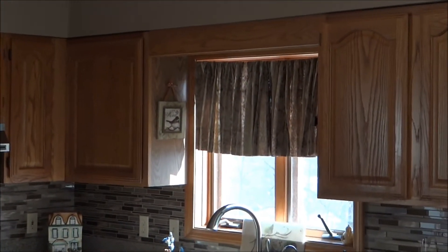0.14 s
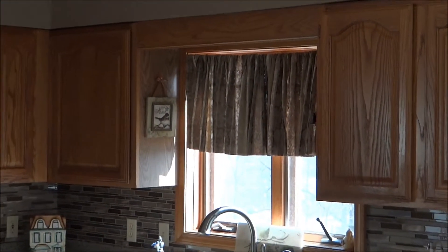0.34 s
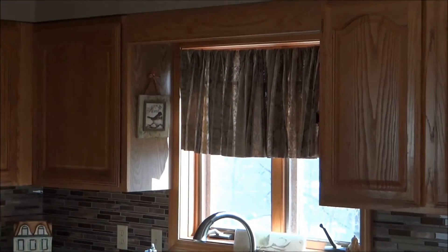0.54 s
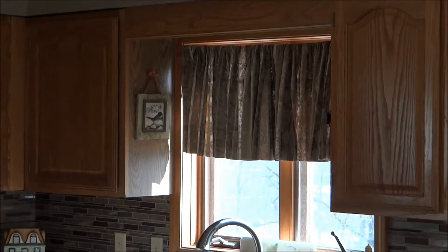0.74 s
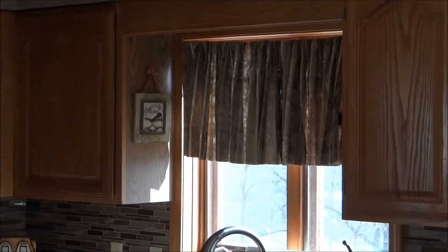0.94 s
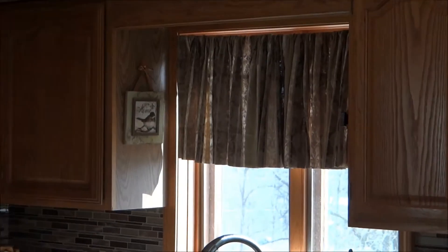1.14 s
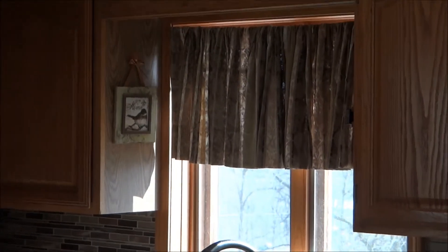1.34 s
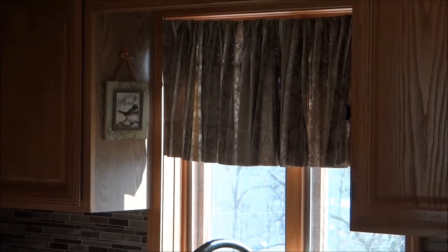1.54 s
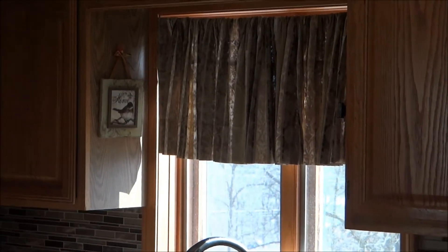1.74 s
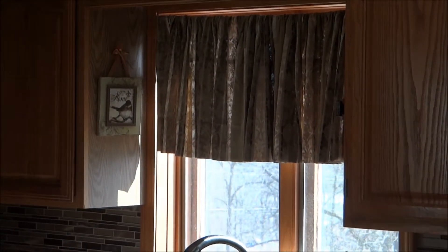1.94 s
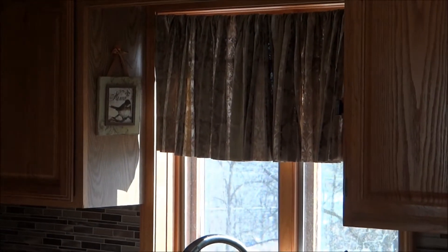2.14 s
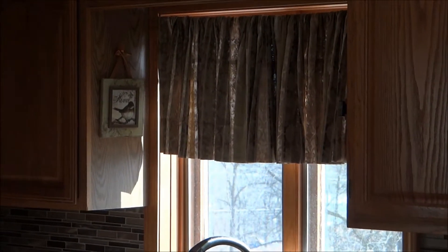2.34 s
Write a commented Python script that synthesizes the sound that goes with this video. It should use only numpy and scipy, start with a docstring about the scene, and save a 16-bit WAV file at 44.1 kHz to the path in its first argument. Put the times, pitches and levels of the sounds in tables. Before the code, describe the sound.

In a quiet room, a camcorder's zoom motor runs right by the microphone, its gears whirring under a high whine. After one sharp switch click it stops, leaving low hiss, a soft knock and faint handling rubs.

```python
"""A camcorder's zoom motor starts up in a quiet room, heard through the camera body.
For a second and a half its steps rattle and its gears whir in the housing, while the sliding lens
hisses and its drive gives a thin, wavering whine. Just before the motor stops, a plastic switch
clicks sharply. Then come faint ticks, a soft knock and finger rubs over the room's low hiss."""
import sys
import numpy as np
from scipy import signal
from scipy.fft import rfft, irfft, next_fast_len
from scipy.io import wavfile
from scipy.ndimage import map_coordinates

SR = 44100
rng = np.random.default_rng(int(sys.argv[2]) if len(sys.argv) > 2 else 0)


def unload_audio(sound):
    """Save the sound as a 16-bit wav file, at the path given as the first command line argument."""
    columns = np.transpose(np.atleast_2d(sound))
    # keep every value between -1 and 1, then stretch to whole-number steps
    steps = np.round(np.clip(columns, -1, 1) * 32767)
    wavfile.write(sys.argv[1], SR, steps.astype(np.int16))


N = 109897

START_S, STOP_S, RUN_DOWN_S = .04, 1.524, .031
LENS_START_S = START_S + .0075  # the lens follows just behind the motor
STEP_HZ = 178.3  # motor steps a second at full speed

# How hard the motor drives the gears. Each row: time in seconds, level in dB.
DRIVE_LEVEL = [(0.06, -48.5), (0.11, -52), (0.25, -50.0), (0.8, -50.5), (0.995, -49.5), (1.495, -48.5),
               (1.53, -47.5)]
# How alike the camera's noises are left and right. Each row: frequency in Hz, likeness (1 = the same).
CAMERA_LIKENESS = [(300,0.3),(640,0.5),(820,.1),(1050,0.49),(1400,0.11),(1750,0.58),(3100,0.63),(6000,0.83),(8000,0.87),(10000,1)]


def motor_steps():
    """The stepping motor speeds up; each step, a little early or late, makes the housing ring briefly."""
    # The notes one step rings. Each row: pitch in Hz, relative level in dB, seconds to its peak.
    step_notes = [(1695,-0.5,0.0013),(1125,-17,.003),(2765,-16.5,0.0011)]
    t = clock()
    rate_hz = STEP_HZ - 84.97 * np.exp(-np.maximum(t - START_S, 0) / .05)
    steps_taken = np.ceil(np.cumsum(rate_hz * (t > START_S)) / SR)
    times = t[np.diff(steps_taken, prepend=0) > 0]
    jitter_s, scatter_db = .00022, 1.1
    late, strength = rng.standard_normal((len(times), 2)).T
    samples = np.clip(np.round((times + jitter_s * late) * SR).astype(int), 0, N - 1)
    pulses = np.bincount(samples, amp(scatter_db * strength), N)
    age = t[:SR // 20]
    one_step = sum(amp(db) * age / peak_s * np.exp(-age / peak_s) * np.sin(2 * np.pi * hz * age)
                   for hz, db, peak_s in step_notes)
    rattle = unit(signal.fftconvolve(pulses, one_step)[:N])
    easing = amp(-2.6 - 2.3 * t)
    return rattle * easing * level(DRIVE_LEVEL) * running(START_S, rise_s=.001)


def gear_whir():
    """Uneven tooth taps and friction, pulsing as the motor steps and the teeth meet, ring the housing."""
    # Where the housing rings. Each row: pitch in Hz, width in Hz, relative level in dB.
    resonances = [(469,35,-12.5),(641,47,-4),(815,56,-3.5),(1023,42,-2.5),(1130,56,-5),(1375,210,-7.5),(1670,64,-4),(1800,100,-8),(2067,120,-12.5),(2676,80,-10),(2835,50,-9.5),(3680,270,-15.5),(4570,110,-20.5)]
    tooth_hz, tap_share = 554, .21
    travel = np.cumsum(1 + .012 * wobble(14)) / SR  # the speed wanders slightly
    load = 1 + .22 * np.cos(2 * np.pi * STEP_HZ * travel)
    pressure = 1 + .46 * np.cos(2 * np.pi * tooth_hz * travel)
    new_tooth = np.diff(np.floor(tooth_hz * travel), prepend=0)
    taps = unit(new_tooth * (.33 + rng.standard_normal((2, N))))
    friction = unit(pressure * rng.standard_normal((2, N)))
    force = load * (np.sqrt(tap_share) * taps + np.sqrt(1 - tap_share) * friction)

    def housing(f):
        return sum((-1) ** k * amp(db) * 1j * f * width / (hz * hz - f * f + 1j * f * width)
                   for k, (hz, width, db) in enumerate(resonances))

    whir = unit(spread(filtered(force, housing), CAMERA_LIKENESS))
    return whir * amp(-2) * level(DRIVE_LEVEL) * running(START_S, rise_s=.0073) * lean_right(.4)


def gear_tone():
    """The gears sing a rough, wavering tone that grows as the lens travels."""
    tone = fuzzy_tone(1023 + 12 * wobble(30), width_hz=50)
    growth = amp(-16 + 2.5 * clock())
    return tone * growth * level(DRIVE_LEVEL) * running(START_S, rise_s=.003)


def lens_slide():
    """The lens carriage hisses and rasps as it slides, in quick, regular surges."""
    # The tone colour of the sliding hiss. Each row: frequency in Hz, relative level in dB.
    hiss_colour = [(300,-12.5),(2500,-3.5),(5500,-8.5),(6500,-5),(7550,-4.5),(7950,1.5),(8550,-4),(9250,2),(9900,-6),(10650,-3.5),(11250,-7.5),(11700,-4),(12850,-.5),(13500,-8.5),(14600,-5.5),(15700,-15.5)]
    # How the hiss rises and falls. Each row: time in seconds, relative level in dB.
    hiss_level = [(0.06, -54), (0.19, -54.5), (0.265, -58.5), (0.295, -53), (0.435, -53), (0.47, -51),
                  (0.545, -52.0), (0.59, -56.5), (0.755, -52), (0.905, -53.5), (0.975, -57.5), (1.01, -53),
                  (1.255, -52.5), (1.29, -56), (1.44, -52.5), (1.53, -53.5)]
    # How the dry rasp in the barrel comes and goes. Each row: time in seconds, relative level in dB.
    rasp_level = [(0.06, -61), (0.265, -64), (0.36, -52.5), (0.525, -61), (0.6, -62.0), (0.79, -65),
                  (0.825, -52), (0.98, -65), (1.155, -60), (1.22, -72), (1.38, -60), (1.53, -62)]
    hiss = noise(lambda f: amp(along(hiss_colour, f)), CAMERA_LIKENESS) * amp(2) * level(hiss_level)
    rasp = band(3800, octaves=.31) * amp(-4) * level(rasp_level)
    surge_db = 1.34 * wobble(75) + 1.15 * np.cos(2 * np.pi * 30 * clock())
    return (hiss + rasp) * amp(surge_db) * running(LENS_START_S, rise_s=.017)


def lens_whine():
    """The lens drive's rough, high squeal glides up to pitch and flutters as the motor turns."""
    # How the whine swells and fades. Each row: time in seconds, relative level in dB.
    whine_level = [(0.055, -56), (0.08, -52), (0.11, -54), (0.15, -46), (0.18, -44), (0.195, -53.5),
                   (0.23, -59.5), (0.3, -51), (0.355, -60), (0.405, -53.5), (0.455, -59.5), (0.55, -51),
                   (0.595, -62), (0.645, -52.5), (0.7, -53.5), (0.765, -51.5), (0.85, -61), (0.905, -53.5),
                   (0.955, -57), (1.015, -54.5), (1.165, -58), (1.19, -50), (1.295, -57), (1.36, -50.5),
                   (1.385, -60), (1.53, -58)]
    t = clock()
    hz = 7006 - 780 * np.exp(-np.maximum(t - START_S, 0) / .045) + 30 * wobble(25)
    core = amp(-2.5) * fuzzy_tone(hz, width_hz=320)
    haze = amp(-5.5) * fuzzy_tone(hz - 170.2, width_hz=1250)
    flicker_db = 1.06 * wobble(34.9) + 2.04 * wobble(100)
    step_phase = 2 * np.pi * STEP_HZ * t
    turning_db = 1.9 * np.cos(step_phase / 2) + 1.8 * np.cos(step_phase)
    flutter = unit(amp(flicker_db + turning_db))
    return (core + haze) * flutter * level(whine_level) * running(LENS_START_S, rise_s=.011)


def switch_click():
    """A plastic switch catches, snaps over and bounces back."""
    # The notes the switch rings. Each row: pitch in Hz, relative level in dB, seconds to fade 60 dB.
    switch_notes = [(720,-24,0.036),(968,-11.5,0.04),(1370,-11.5,0.042),(1630,-8.5,0.01),(2304,-6,0.013),(2514,-7,0.014),(3010,-17.5,.016),(3500,-18,0.0056),(4315,-2.5,0.007),(4580,-9.5,.005),(5030,-14,0.006),(6540,-28,.012),(7100,-25,.012),(14000,-11,0.002)]
    # Its three hits. Each row: start in seconds, relative level in dB, left-right phase gap in radians.
    hits = [(1.32648,-27.5,-1.74),(1.3269,-19,1.1),(1.3313,-42,1)]
    click = sum(strike(switch_notes, start_s, db, low_cut_hz=720, phase_gap=gap)
                for start_s, db, gap in hits)
    return click * lean_right(.6)


def light_tick():
    """A small part is tapped and rings high and briefly."""
    # The notes of the tick. Each row: pitch in Hz, relative level in dB, seconds to fade 60 dB.
    tick_notes = [(2650,-0.5,0.023),(2780,-11,.012),(8540,-5,0.0018),(11500,-3.5,0.0025),(14000,-7,.002)]
    return strike(tick_notes, start_s=2.1332, db=-34, low_cut_hz=720, phase_gap=2.14) * lean_right(1)


def body_knock():
    """A soft knock rings the camera body's lower notes."""
    # The notes of the knock. Each row: pitch in Hz, relative level in dB, seconds to fade 60 dB.
    knock_notes = [(200,-15,0.23),(277,-7.5,0.047),(1195,0.5,0.023),(1480,-2,0.022),(1900,-12,0.02)]
    knock = strike(knock_notes, start_s=2.1812, db=-37.5, low_cut_hz=171, phase_gap=.66)
    return knock * lean_right(2.2)


def rubs():
    """Fingers and plastic parts scuff, each making a puff of noise that swells and dies away."""
    # Scuffs on the case and in the lens barrel. Each row: start in seconds, level in dB,
    # seconds to swell, seconds to fade 60 dB, centre pitch in Hz, width in octaves.
    scuffs = [(1.315,-39.5,0.0043,0.058,5100,.6),(1.318,-33.5,0.007,0.025,2220,1.16),(0.0405,-46,0.002,0.074,1080,.4),(.072,-47.5,0.0058,0.063,450,.8),(.101,-54,0.0042,0.097,2790,0.16),(.301,-51.5,.002,.03,2750,.2),(.787,-55,.008,.08,2700,.15),(.885,-57,.015,.3,1020,.14),(1.065,-54,0.022,.25,1170,0.3),(1.46,-51,.04,0.23,970,0.7),(1.561,-51.5,.001,0.03,2800,.8),(1.716,-57,.001,.04,7800,0.28),(1.708,-55,0.0093,0.068,530,0.69),(2.13,-58,0.027,.3,4250,0.22),(2.17,-52.5,0.01,0.14,4100,.4),(2.15,-58.5,0.034,0.63,9500,0.89),(2.133,-56.5,.01,0.73,1900,1.9),(2.407,-47,.001,.015,7300,.6),(2.4065,-48,.001,0.025,650,1.2),(2.412,-60,.01,.25,7700,.55),(2.405,-55.5,0.021,0.39,750,1.6)]
    t = np.arange(SR // 2) / SR
    out = np.zeros((2, N))
    for start_s, db, swell_s, fade_s, hz, octaves in scuffs:
        shape = np.clip(t / swell_s, 0, 1) * amp(db - 60 * np.maximum(t - swell_s, 0) / fade_s)
        out += placed(shape * band(hz, octaves, size=len(t)), start_s)
    return out


def room():
    """Still air and microphone hiss, with faint hums and a thin electronic tone."""
    # The tone colour of the air and hiss. Each row: frequency in Hz, relative level in dB.
    air_colour = [(25,-29),(64,-17.5),(120,-10.5),(270,-5),(550,-3),(800,-3.5),(1500,-6),(2000,-10),(3400,-12.5),(5500,-14.5),(11500,-19),(14000,-20.5),(15800,-28)]
    # How alike the air is left and right. Each row: frequency in Hz, likeness (1 = the same).
    air_likeness = [(60,0.91),(180,0.58),(550,0.13),(1650,0.13),(5000,0.57),(15000,0.93)]
    # Background hums. Each row: pitch in Hz, level in dB, width in Hz.
    hums = [(98.4,-81,7),(476.3,-73,32),(812,-72.5,30),(8060,-78.5,230)]
    air = amp(-55.5) * noise(lambda f: amp(along(air_colour, f)), air_likeness)
    thin_tone = amp(-76) * unit(np.sin(2 * np.pi * 12000 * clock()))
    return air + thin_tone + sum(amp(db) * fuzzy_tone(hz, width) for hz, db, width in hums)


def strike(notes, start_s, db, low_cut_hz, phase_gap):
    """One hit on a part too small to give off bass; its lower notes reach left and right out of step."""
    t = np.arange(SR // 4) / SR
    ring = np.zeros((2, len(t)))
    for hz, note_db, fade_s in notes:
        shift = np.array([[.5], [-.5]]) * phase_gap / (1 + (hz / 5000) ** 2)
        ring += amp(note_db - 60 * t / fade_s) * np.sin(2 * np.pi * hz * t + shift)
    low_cut = signal.butter(4, low_cut_hz, "high", fs=SR, output="sos")
    return placed(amp(db) * signal.sosfilt(low_cut, ring), start_s)


def running(start_s, rise_s):
    """A gain that fades in at the start and out when the motor stops."""
    t = clock()
    return np.clip((t - start_s) / rise_s, 0, 1) * np.clip(1 - (t - STOP_S) / RUN_DOWN_S, 0, 1)


def fuzzy_tone(hz, width_hz):
    """A tone whose strength and phase wander, blurring its pitch."""
    phase = 2 * np.pi * np.cumsum(hz + np.zeros(N)) / SR
    return unit(wobble(width_hz) * np.cos(phase) + wobble(width_hz) * np.sin(phase))


def band(hz, octaves, size=N):
    """Stereo noise that is strongest at hz and falls away on both sides."""
    return noise(lambda f: np.exp(-.5 * (np.log2((f + 1) / hz) * 2 / octaves) ** 2),
                 CAMERA_LIKENESS, size)


def noise(colour, likeness, size=N):
    """Stereo noise with a given tone colour and left-right likeness."""
    length = next_fast_len(size, True)
    f = np.fft.rfftfreq(length, 1 / SR)
    alike = np.clip(along(likeness, f), -1, 1)
    spectrum = rfft(rng.standard_normal((2, length))) * colour(f)
    mid, side = irfft(spectrum * np.sqrt([1 + alike, 1 - alike]), length)[:, :size]
    return unit(np.array([mid + side, mid - side]))


def spread(pair, likeness):
    """Mix two unrelated signals into left and right of a given likeness."""
    def weights(f):
        angle = np.arccos(np.clip(along(likeness, f), -1, 1)) / 2
        return np.array([np.cos(angle), np.sin(angle)])

    mid, side = filtered(pair, weights)
    return np.array([mid + side, mid - side])


def wobble(rate):
    """A smooth curve through random points, rate of them a second."""
    samples = np.linspace(0, N, N // 16)
    coarse = map_coordinates(rng.standard_normal(N // 16), [samples / SR * rate + 2], mode="wrap")
    return unit(np.interp(np.arange(N), samples, coarse))


def filtered(x, response):
    """Multiply each frequency in x by response(frequency)."""
    length = next_fast_len(N + 8192)
    return irfft(rfft(x, length) * response(np.fft.rfftfreq(length, 1 / SR)), length)[..., :N]


def placed(sound, start_s):
    """Set a short stereo sound at its start time."""
    return np.pad(sound, ((0, 0), (max(round(start_s * SR), 0), N)))[:, :N]


def along(rows, hz):
    """Read between rows of frequency and value, on a log frequency scale."""
    frequencies, values = np.transpose(rows)
    return np.interp(np.log(hz + 1), np.log(frequencies + 1), values)


def level(rows):
    """A gain for every sample, from rows of seconds and dB."""
    return amp(np.interp(clock(), *np.transpose(rows)))


def lean_right(db):
    """Gains that turn the left side down and the right side up by db."""
    return amp([[-db], [db]])


def amp(db):
    """Turn decibels into a gain."""
    return 10 ** (np.asarray(db) / 20)


def unit(x):
    """Scale to an average strength (rms) of 1."""
    return x / np.sqrt(np.mean(x ** 2) + 1e-20)


def clock():
    """The time of each sample in seconds."""
    return np.arange(N) / SR


def scene():
    """The zoom, the handling noises and the room together."""
    zoom = motor_steps() + gear_whir() + gear_tone() + lens_slide() + lens_whine()
    handling = switch_click() + light_tick() + body_knock() + rubs()
    return zoom + handling + room()


def record(dry):
    """The high treble is the same left and right, and the very top is cut off."""
    mono_above_hz, top_hz = 10000, 15800
    mid = dry.mean(axis=0)
    sides = filtered(dry - mid, lambda f: f < mono_above_hz)
    return filtered(mid + sides, lambda f: f < top_hz)


dry = scene()
out = record(dry)
unload_audio(out)
```